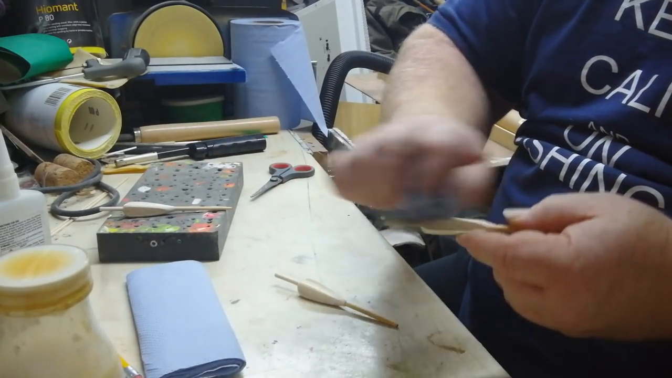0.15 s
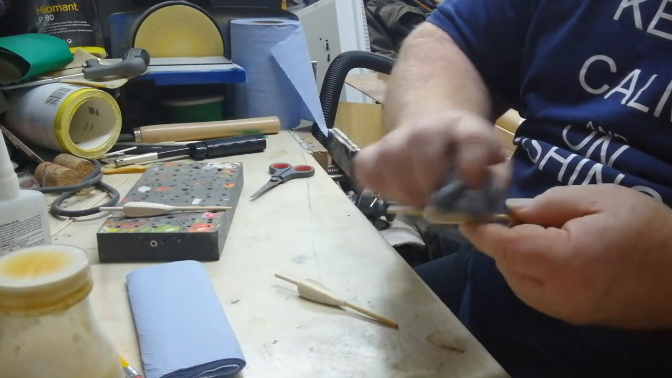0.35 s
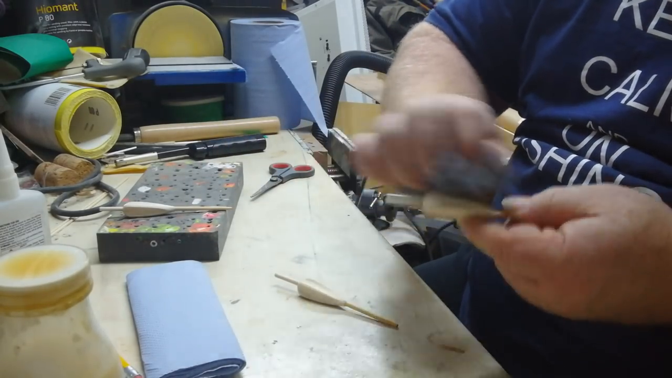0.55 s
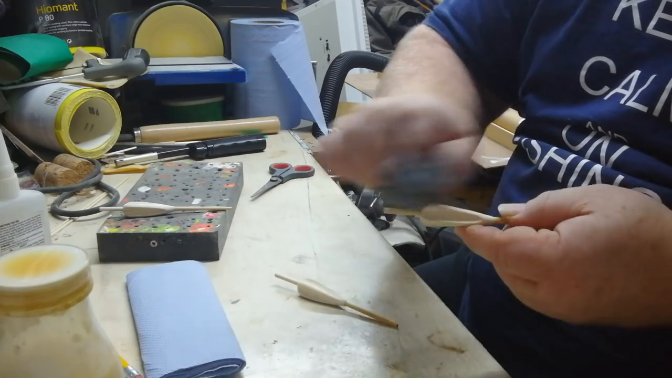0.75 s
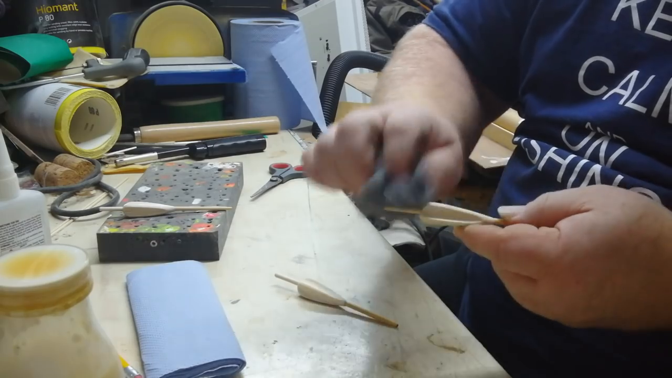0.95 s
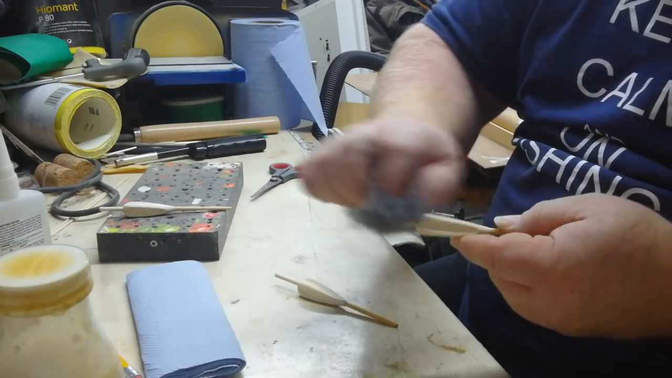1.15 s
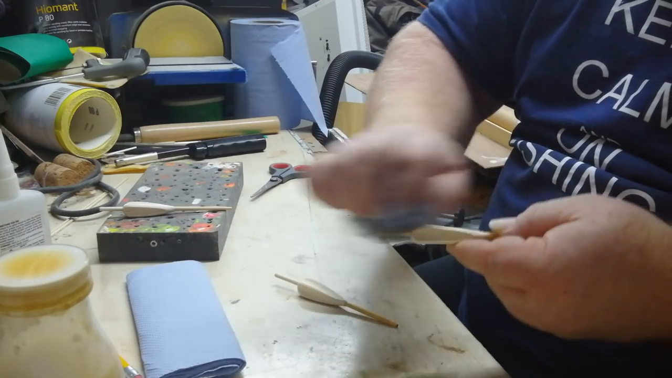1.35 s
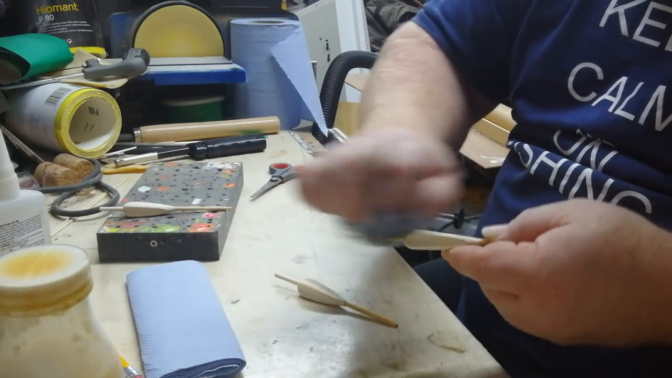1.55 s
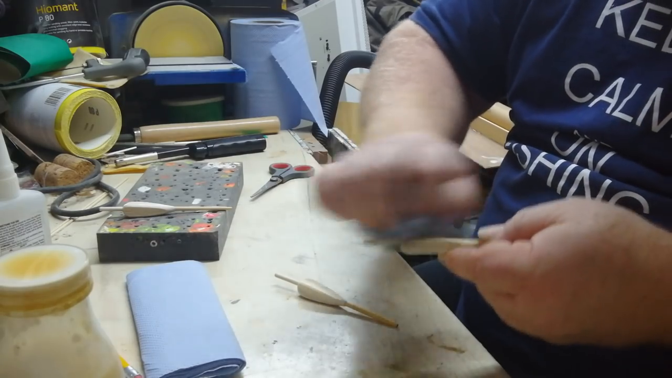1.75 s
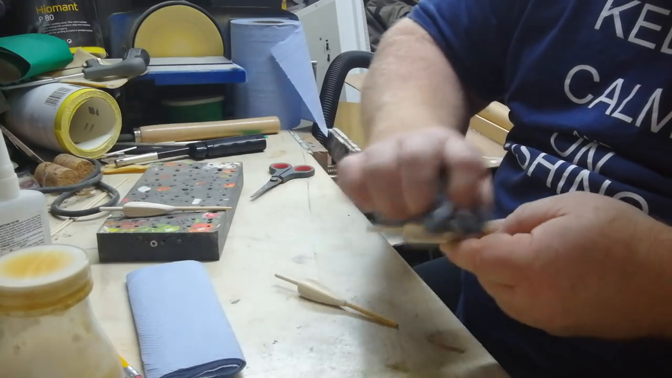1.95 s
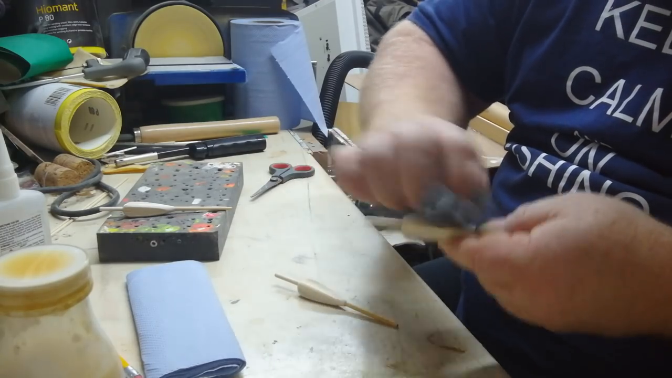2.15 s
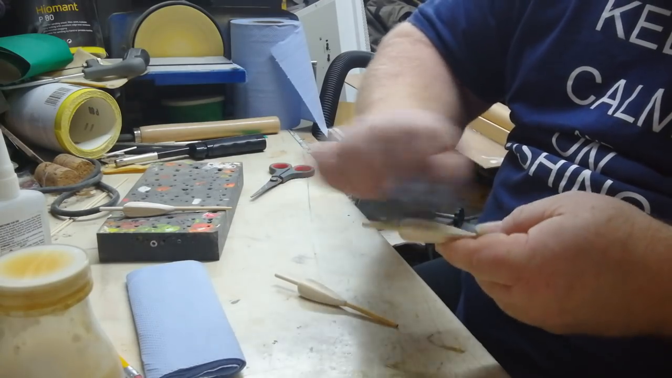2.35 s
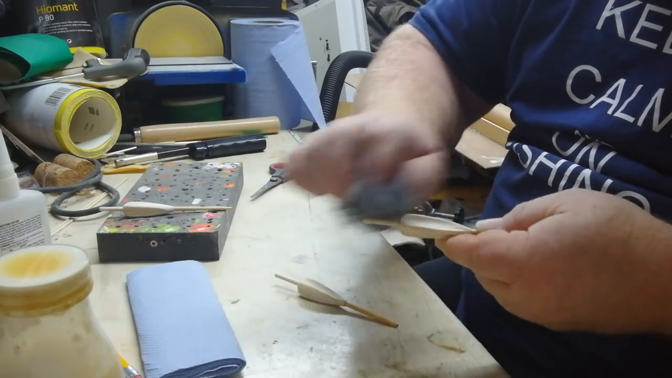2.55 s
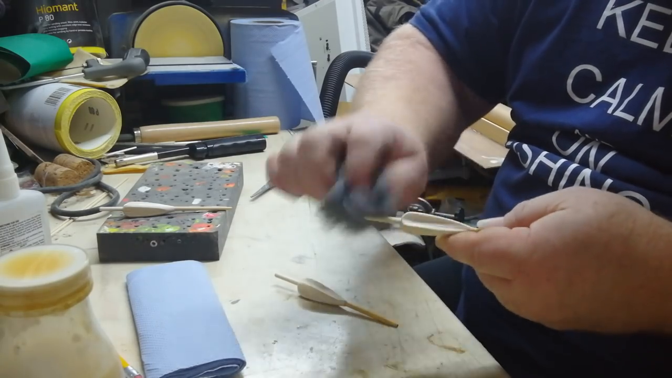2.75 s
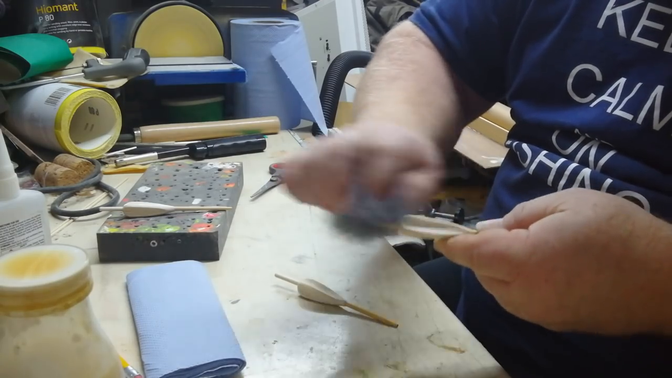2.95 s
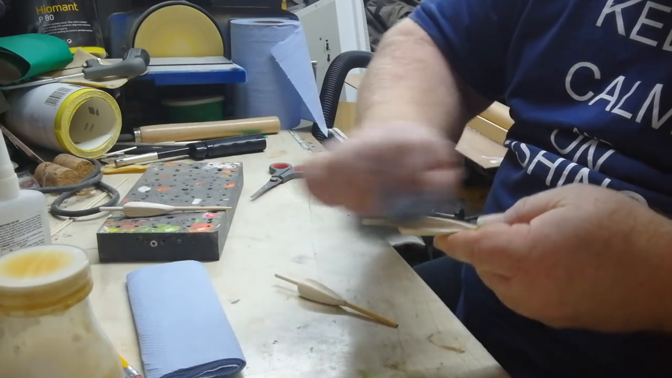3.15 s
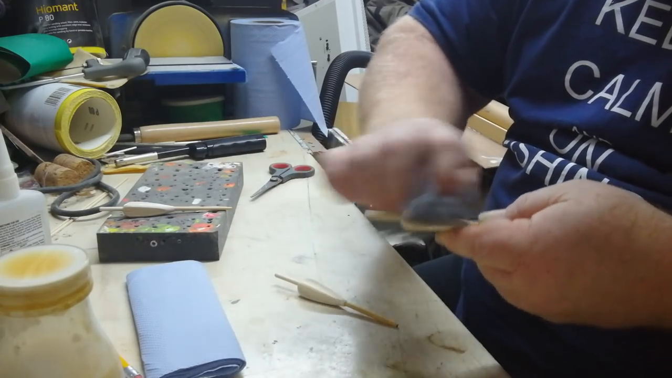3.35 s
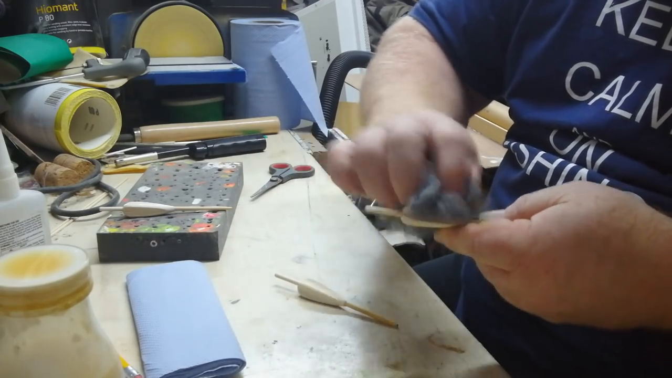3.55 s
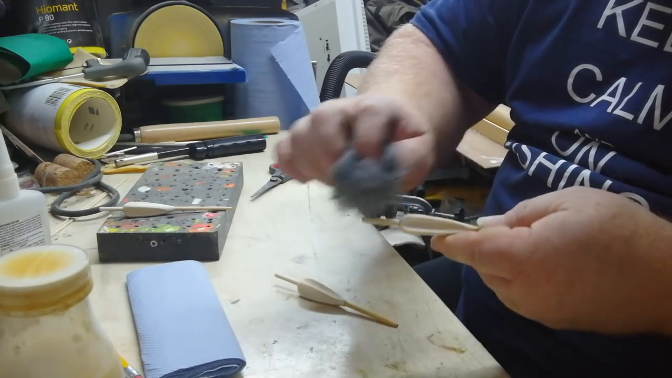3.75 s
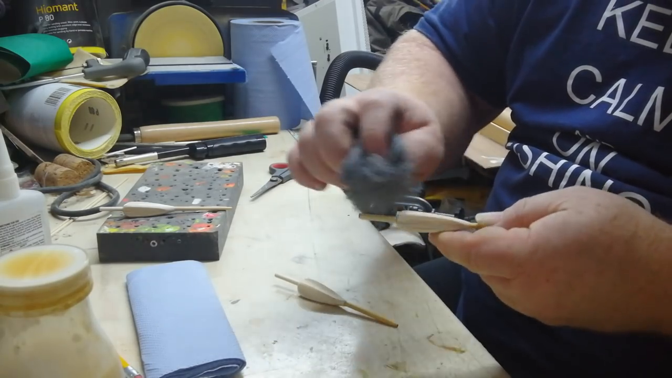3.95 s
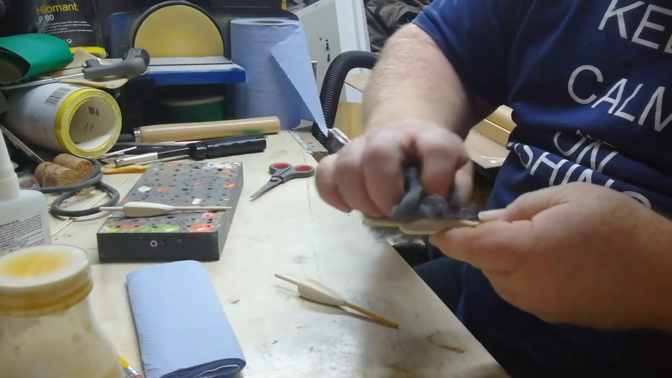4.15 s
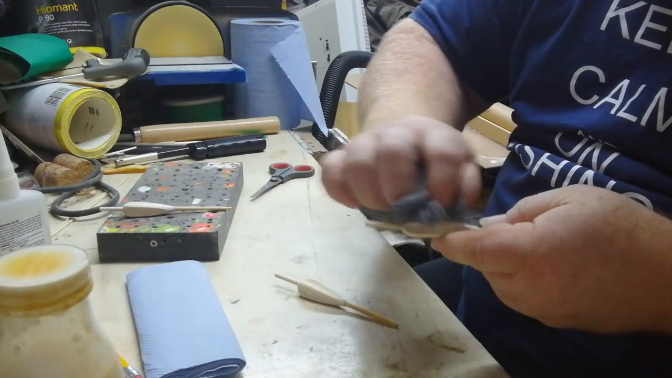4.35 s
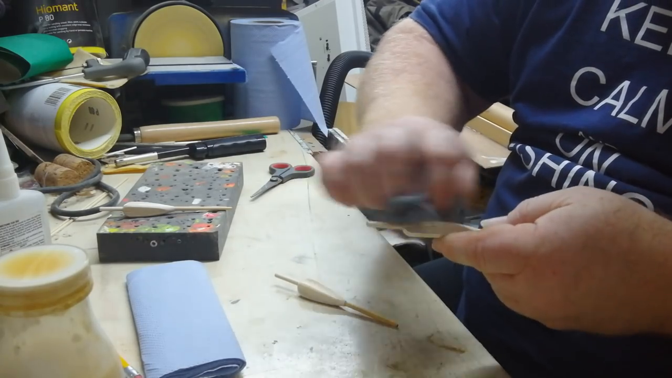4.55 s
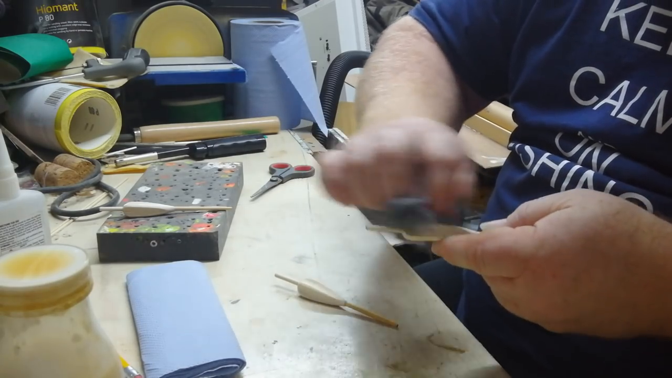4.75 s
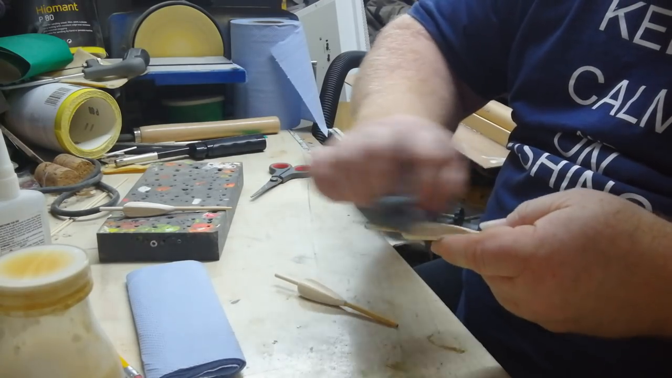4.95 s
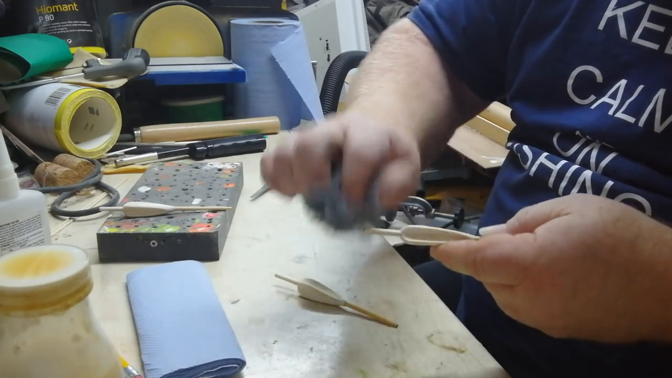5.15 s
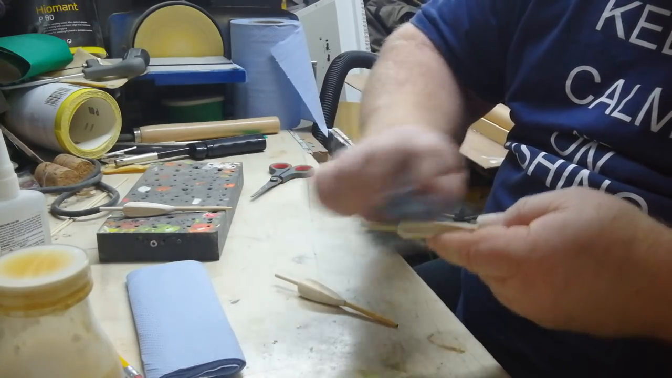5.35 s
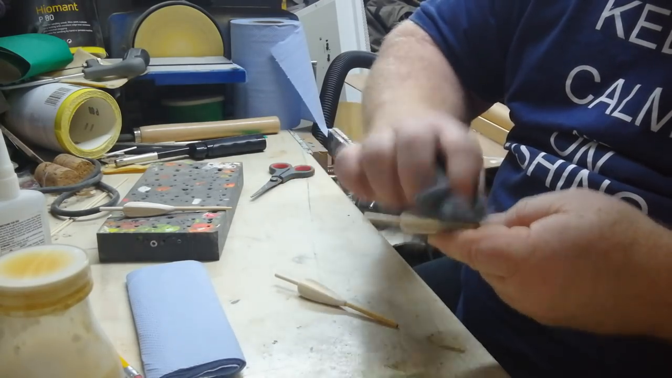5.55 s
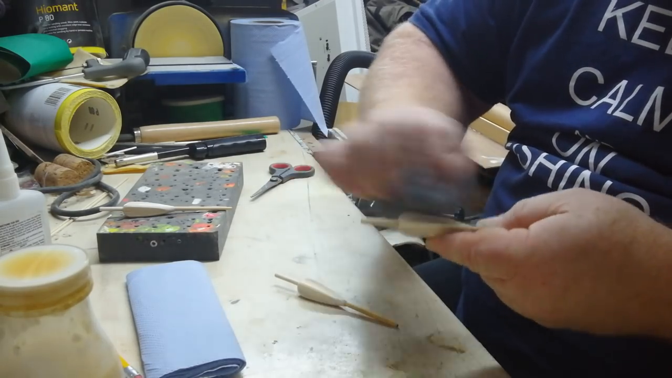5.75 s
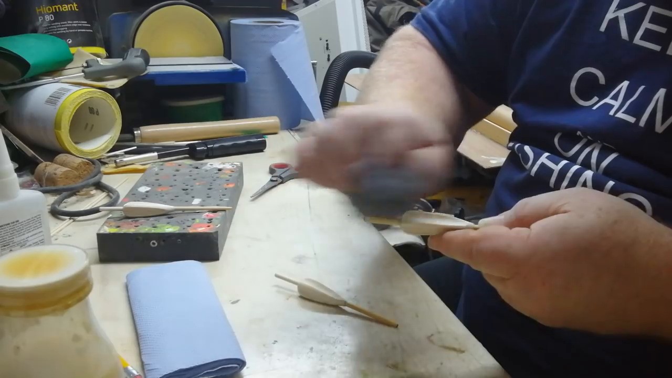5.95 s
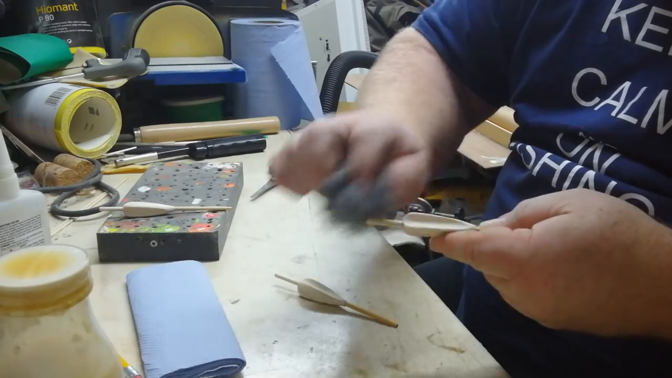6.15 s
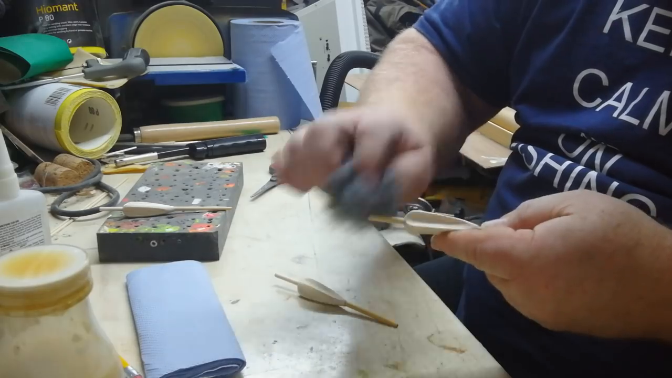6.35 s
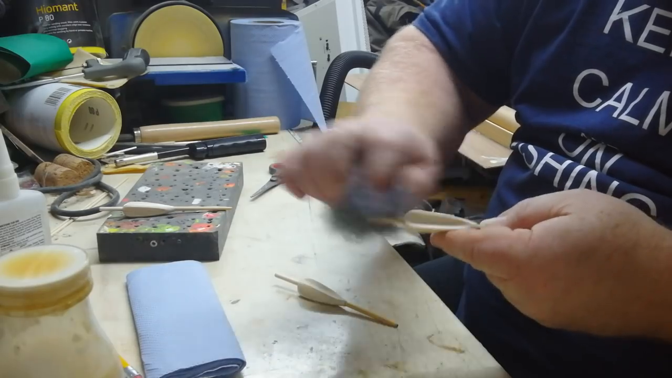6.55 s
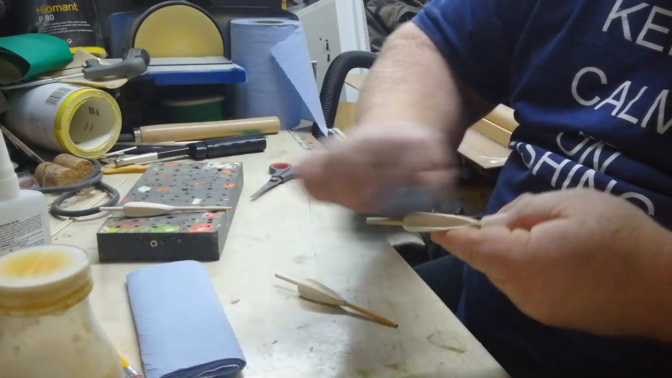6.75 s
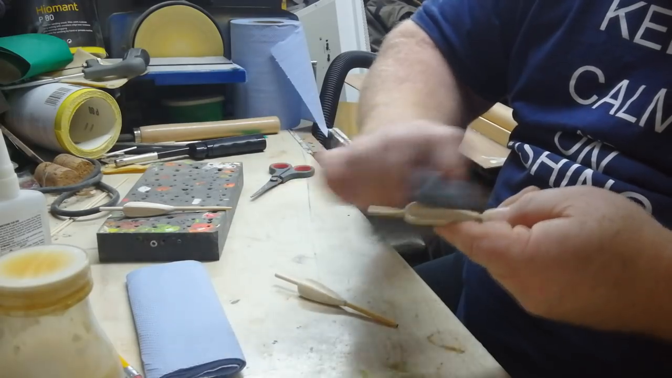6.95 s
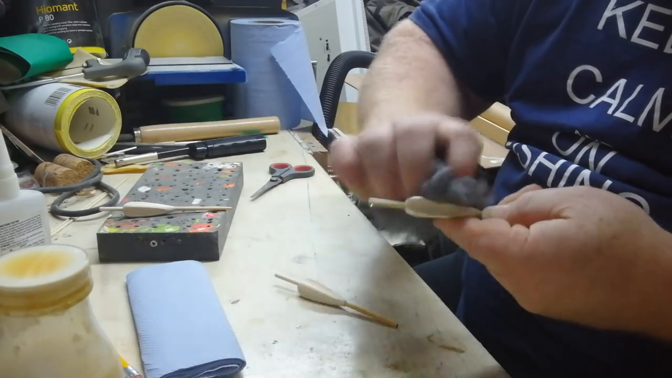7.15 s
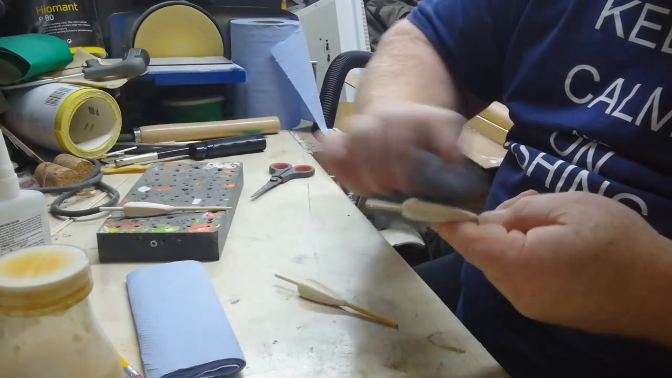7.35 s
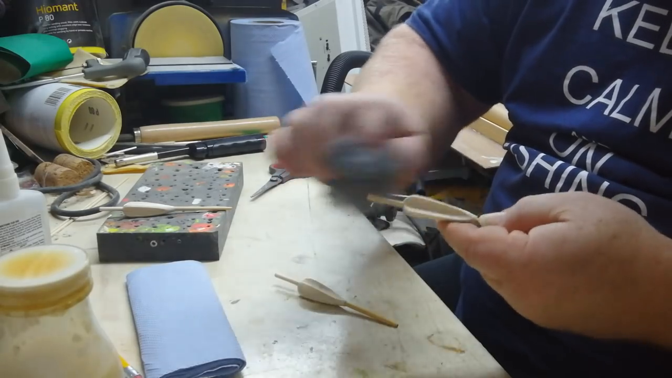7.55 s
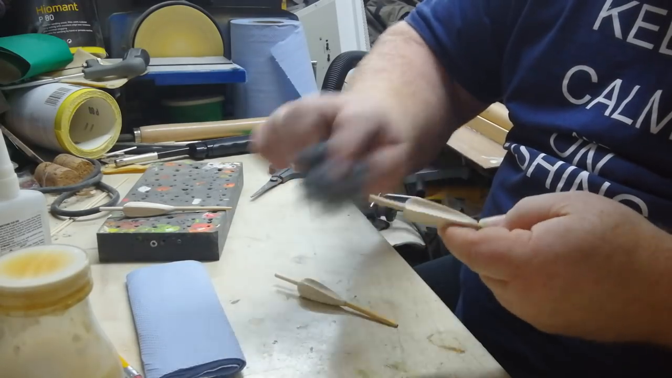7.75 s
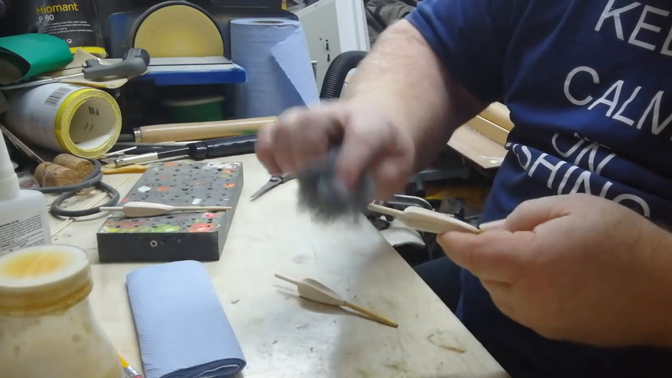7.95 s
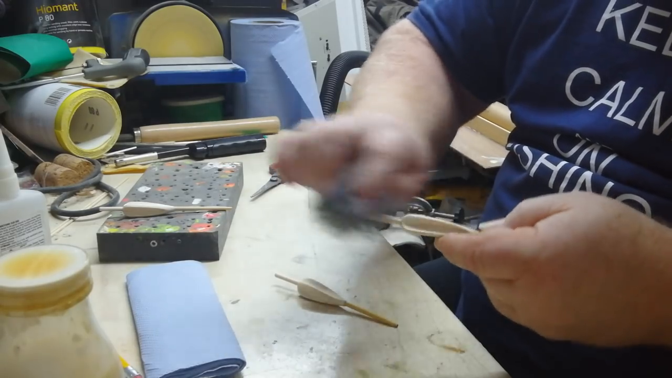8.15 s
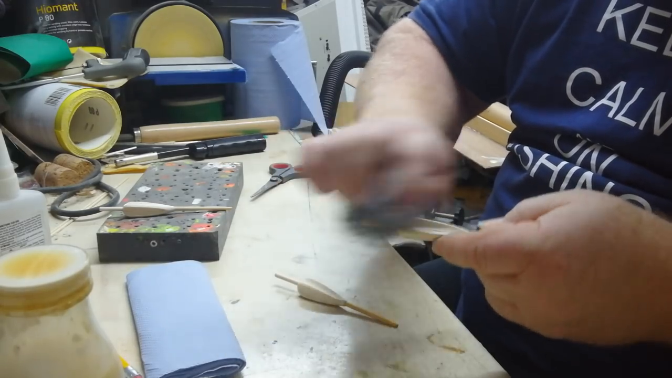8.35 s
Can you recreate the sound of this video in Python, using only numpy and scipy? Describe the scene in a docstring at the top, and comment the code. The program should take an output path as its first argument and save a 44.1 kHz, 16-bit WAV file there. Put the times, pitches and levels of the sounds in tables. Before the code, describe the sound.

Close to a stereo microphone, a pad of fine steel wool rubs a small wooden float in short, bright, gritty swishes, about four a second. After a brief gap near four seconds the strokes quicken, then return to the steady pace with sharper snags. Faint thin ringing from the stem and a few dull bench bumps appear. The workshop is small and dry, with low rumble and soft hiss.

```python
"""In a quiet workshop, a pad of fine steel wool strokes a small wooden float close to two unlike microphone ports.
Sixteen strokes come first, about four a second; from 4 s ten follow at a quicker pace, from 5.2 s fourteen more.
Each is a burst of random fibre snaps; light touches and hard snags fall among them, and the thin stem rings.
Dull bumps, each a dying mode with a tick, come through the bench at 2.5, 3.2 and 8 s.
A short room tail follows every sound; rumble and hiss from random spectra lie under it all."""
import sys
import numpy as np
from scipy import signal
from scipy.fft import rfft, irfft
from scipy.io import wavfile
from scipy.ndimage import uniform_filter1d

SR = 44100
rng = np.random.default_rng(int(sys.argv[2]) if len(sys.argv) > 2 else 0)


def pcm_store(signal):
    """Save signal as 16-bit PCM."""
    levels = np.round(np.clip(np.atleast_2d(signal), -1, 1) * 32767)
    wavfile.write(sys.argv[1], SR, levels.astype(np.int16).T)


N = 374188  # samples

# Pressed strokes on the float:
# full contact begins t/s, its length t/ms, first level/dB, last level/dB
PRESSED_STROKES = [(0.029, 69, -50, -52.5), (0.272, 63, -52.5, -48), (0.526, 49.3, -44, -45.5),
                   (0.769, 58, -44.5, -48.0), (0.996, 62, -44.5, -49.5), (1.215, 61.3, -47.5, -46),
                   (1.449, 63, -44.5, -52), (1.677, 56, -44, -47.0), (1.905, 49.5, -46.5, -44.5),
                   (2.143, 45, -42, -45), (2.372, 47.5, -43.0, -44.5), (2.597, 36.7, -40, -40),
                   (2.822, 44, -42.0, -42.5), (3.044, 43, -45.0, -44), (3.272, 43.5, -46.5, -40.5),
                   (3.51, 42.4, -46, -43), (4.023, 68, -60.5, -54.5), (4.118, 56, -46.5, -55.5),
                   (4.214, 38, -51.5, -46), (4.322, 53, -47, -50.5), (4.422, 46, -49, -48),
                   (4.534, 41, -45.5, -50.5), (4.631, 34, -46.0, -46.5), (4.736, 41, -43.5, -46.5),
                   (4.833, 43, -47, -46.5), (4.948, 54.4, -45.5, -42.5), (5.251, 38, -44, -43.5),
                   (5.496, 43, -42, -46), (5.727, 41, -43.5, -44), (5.96, 44, -42, -48),
                   (6.187, 41, -43, -44), (6.425, 38, -42.5, -42.5), (6.653, 34.3, -43, -44.5),
                   (6.884, 35, -40.5, -49), (7.112, 36, -41, -52), (7.343, 45, -42, -56.5),
                   (7.582, 32, -42, -47), (7.809, 42, -41, -56), (8.037, 36, -41.5, -53.0),
                   (8.259, 48, -43.5, -54.5)]
# Rasp of the wood, stronger under the flatter part of the pad: t/s, rasp over the scratch level/dB
WOOD_RASP = [(0, 9.5), (.6, 2), (1.6, 5.5), (2, 1), (3.5, 0.5), (4.2, 2), (5.2, 3), (6.3, 0.5), (6.8, 3),
             (7.2, 1.5), (8.4, 4.2)]
# Light touches, mostly as the pad lands for the next stroke:
# full contact begins t/s, its length t/ms, level/dB before each layer's own touch gain
LIGHT_TOUCHES = [(0.218, 29, -62), (0.72, 34, -54), (0.94, 16, -56.5), (1.155, 14, -51.5),
                 (1.388, 11, -49.5), (1.606, 27, -51.0), (1.844, 25, -51.5), (2.081, 12, -55.5),
                 (2.322, 12, -59.0), (2.474, 36, -55.0), (2.521, 37, -47), (2.747, 51, -53),
                 (2.952, 98, -50.5), (3.166, 7.3, -58), (3.189, 46, -45), (3.451, 11, -46.5),
                 (3.66, 31, -62), (3.706, 5, -50), (3.92, 14, -61), (3.95, 41, -42.5), (5.194, 21, -44),
                 (5.445, 36, -49.5), (5.607, 4.6, -51), (5.671, 18, -55), (5.897, 9.4, -52.5),
                 (6.122, 31, -52), (6.376, 89, -53), (6.596, 29, -54.5), (6.82, 34, -55.5),
                 (7.026, 17, -69), (7.291, 12, -55.5), (7.513, 11, -50.0), (7.74, 5.4, -44),
                 (7.969, 19, -41), (8.199, 26, -48.5), (8.451, 61, -52)]
# Tufts that snag hard on the wood: t/s, level/dB
HARD_SNAGS = [(3.091, -38), (3.555, -42), (5.001, -40.5), (5.5433, -41), (5.7746, -40), (5.9943, -37),
              (6.1315, -57), (6.236, -37), (7.5837, -38.5), (7.811, -37.5), (7.968, -58), (8.0476, -42),
              (8.198, -59)]
# The thin stem rings most when the pad works near the tip: t/s, ring over the scratch level/dB, f/Hz
STEM_RING = [(0, -8.5, 9700), (1.6, -21.5, 9270), (2.3, -28, 9170), (2.8, -8.5, 9700), (3.8, -13, 9450),
             (4.1, -31.5, 8650), (5.05, -19.5, 8550), (5.6, -38, 10150), (6.6, -11.5, 9530),
             (7.4, -7, 9370), (7.9, -19.5, 9660), (8.25, -10.5, 8660)]
# Each rise and fall time is the time for 20 dB
PRESS_RISE_MS, PRESS_FALL_MS = 34.8, 27
TOUCH_RISE_MS, TOUCH_FALL_MS, TOUCH_SAG_DB_PER_MS = 8., 15, -0.1137
SNAG_MS, SNAG_RISE_MS, SNAG_FALL_MS = 4.5, 5.3, 2.3
MID_EASE_DB = -1  # the pad bites on arriving and on leaving, and eases between
RASP_TILT = 0.58  # the rasp follows only this share of a stroke's swell or fade


def rubbing():
    """Fibre snaps follow each contact; pressure brings out the wood, light touches are thin and ring the stem."""
    t = np.arange(N) / SR
    press, rasp, touch, snag = 0, 0, 0, 0  # powers
    for s, ms, first_db, last_db in PRESSED_STROKES:
        press = press + contact(s, ms, first_db, last_db, PRESS_RISE_MS, PRESS_FALL_MS, MID_EASE_DB)
        middle_db = (first_db + last_db) / 2
        tilt_db = RASP_TILT * (first_db - last_db) / 2
        rasp = rasp + contact(s + 0.0036, ms, middle_db + tilt_db, middle_db - tilt_db,
                              PRESS_RISE_MS, PRESS_FALL_MS)
    for s, ms, db in LIGHT_TOUCHES:
        touch = touch + contact(s, ms, db, db + TOUCH_SAG_DB_PER_MS * ms, TOUCH_RISE_MS, TOUCH_FALL_MS)
    for s, db in HARD_SNAGS:
        snag = snag + contact(s, SNAG_MS, db, db, SNAG_RISE_MS, SNAG_FALL_MS)
    # from power every 20 samples to amplitude at every sample
    press, rasp, touch, snag = (np.sqrt(np.repeat(v, 20)[:N]) for v in (press, rasp, touch, snag))
    rasp = gain_of(np.interp(t, *np.transpose(WOOD_RASP))) * rasp

    snaps = fibres()
    low = below(snaps, 6500.0)
    s, ring_db, hz = np.transpose(STEM_RING)
    ring_hz = np.interp(t, s, hz)
    ring = evened(np.array([resonate(v, ring_hz, 230.0) for v in snaps]))
    at_tip = np.interp(t - .012, t, press)  # the pad reaches the stem late in the stroke
    ring *= gain_of(np.interp(t, s, ring_db)) * (at_tip + snag + gain_of(-2.0) * touch)
    scratch = np.hypot(np.hypot(press, snag), gain_of(-9.5) * touch)
    rasp = np.hypot(rasp, gain_of(-23.5) * touch)
    return rasp * low + scratch * (snaps - low) + ring


def contact(s, ms, first_db, last_db, rise_ms, fall_ms, ease_db=0):
    """Power of one contact over time: straight slopes in dB up to, along and down from the full contact."""
    t = np.arange(N // 20 + 1) * 20 / SR
    half = max(ms, .1) / 2
    corners = s + np.cumsum([-4 * rise_ms, 4 * rise_ms, half, half, 4 * fall_ms]) / 1000
    middle_db = (first_db + last_db) / 2 + ease_db
    db = [first_db - 80, first_db, middle_db, last_db, last_db - 80]
    return gain_of(2 * np.interp(t, corners, db))


TUFT_BANDS_HZ = (6500, 10500)  # borders between coarse, middle and fine tufts
OWN_FIBRES = 0.67  # amplitude of the snaps that one port alone hears


def fibres(snaps_per_s=12000., spread_db=1.0, tufts_per_s=250.0, tuft_db=2.5, tuft_peak_ms=0.325, depth=0.51):
    """Fibres snap singly, and coarse, middle or fine tufts let go together; each port hears some of its own."""
    snaps = gain_of(spread_db * np.minimum(rng.exponential(1, (3, N)), 6))
    snaps *= rng.choice([-1., 1.], (3, N))
    snaps *= rng.random((3, N)) < snaps_per_s / SR
    # the third stream reaches both ports
    snaps = np.sqrt(1 - OWN_FIBRES ** 2) * snaps[2] + OWN_FIBRES * snaps[:2]
    coarse, not_fine = (below(snaps, hz) for hz in TUFT_BANDS_HZ)
    u = np.arange(400) / (tuft_peak_ms * SR / 1000)
    swell = u * np.exp(1 - u)  # quick rise, slower fall
    out = 0
    for band in (coarse, not_fine - coarse, snaps - not_fine):
        tufts = gain_of(tuft_db * np.minimum(rng.exponential(1, N), 2.5))
        tufts *= rng.random(N) < tufts_per_s / SR
        out = out + band * (1 + depth * signal.oaconvolve(tufts, swell)[:N])
    return evened(shifting(out))


def shifting(x, patchy_db=2.14):
    """The pad turns and the hands shade it, so the colour drifts in random patches of time and frequency."""
    z = signal.stft(x, nperseg=256, noverlap=192)[2]
    patches = rng.standard_normal(z.shape[1:])
    patches = evened(uniform_filter1d(uniform_filter1d(patches, 4, 0), 50, 1))
    return signal.istft(z * gain_of(patchy_db * patches), nperseg=256, noverlap=192)[1][:, :N]


# Colour of the scratch at the two microphone ports: f/Hz, left relative level/dB, right relative level/dB
PORT_COLOURS = [(1080, -45.5, -37.5), (1820, -28, -38), (2430, -36, -29), (2890, -31, -25),
                (4260, -21.5, -15.5), (5370, -17.5, -19), (7300, -26.5, -10), (8070, -6.5, -1.5),
                (8740, -19.5, -2), (9500, -11, -6.5), (10650, -14.5, -9), (12200, -10.5, -12.5),
                (13100, -9, -12), (14400, -9, -15), (16200, -11.5, -12)]
# Echoes off bench and hands, paths some 0.2 and 0.5 m longer: delay t/ms, left level/dB, right level/dB
NEAR_ECHOES = [(.57, -16, -20), (1.41, -12, -20)]
# Cavity of the left, then of the right port: f/Hz, width f/Hz, level/dB
PORT_CAVITIES = [(13620, 73, 2), (8320, 120, -13)]
LEFT_LAG_MS = 0.1161  # some 4 cm farther from the float


def ports(x):
    """Each port colours the sound its own way; near surfaces send echoes and the left hears late."""
    hz = np.fft.rfftfreq(2048, 1 / SR)
    level = np.sqrt(np.mean(gain_of(2 * read(PORT_COLOURS, hz, column=2))))  # of the right port
    out = []
    for c in range(2):
        colour = rfft(causal(read(PORT_COLOURS, hz, column=1 + c)))
        paths = 1 + sum(gain_of(e[1 + c]) * np.exp(-2j * np.pi * hz * e[0] / 1000) for e in NEAR_ECHOES)
        late = np.exp(-2j * np.pi * hz * (1 - c) * LEFT_LAG_MS / 1000)
        response = irfft(colour * paths * late)[:1024]
        heard = signal.oaconvolve(x[c], response)[:N] / level
        ring_hz, width_hz, ring_db = PORT_CAVITIES[c]
        out.append(heard + gain_of(ring_db) * resonate(heard, ring_hz, width_hz))
    return gain_of(3.5) * np.array(out)


# Dull bumps through the bench: t/s, mode level/dB, f/Hz, mode's 60 dB decay t/s, tick level/dB
BENCH_BUMPS = [(2.467, -63, 385, 0.045, -63.5), (3.159, -51.5, 139, 0.13, -92),
               (8.031, -60, 600, 0.037, -66)]


def bumps():
    """Each bump is one soft, quickly dying mode with a dull tick at its start."""
    out = np.zeros(N + SR)
    t = np.arange(SR // 4) / SR
    ticks = evened(below(rng.standard_normal((len(BENCH_BUMPS), len(t))), 5500.0))
    for (s, db, hz, t60, tick_db), tick in zip(BENCH_BUMPS, ticks):
        soft_start = 1 - np.exp(-t / 0.0017)
        mode = gain_of(db - 60 * t / t60) * soft_start * np.sin(2 * np.pi * hz * t)
        at = round(s * SR)
        out[at:at + len(t)] += mode + gain_of(tick_db - 60 * t / 0.19) * tick
    return out[:N]


HANDS_TURNS_PER_S = 1.684  # sets of paths into the room that the moving hands pass each second


def workshop(x, t60=0.066, wet_db=-6.5, count=4):
    """A short cluttered-room tail, other for each port; moving hands blend from one set of paths to the next."""
    t = np.arange(SR // 3) / SR
    turn = np.arange(N) / SR * HANDS_TURNS_PER_S
    tails = rng.standard_normal((count, 2, len(t))) * gain_of(-60 * t / t60) * (t > .004)
    wet = 0
    for k, tail in enumerate(tails):
        apart = abs((turn - k + count / 2) % count - count / 2)  # steps around the circle of sets
        share = np.cos(np.pi / 2 * np.minimum(apart, 1))
        wet = wet + signal.oaconvolve(x * share, tail, axes=1)
    return x + gain_of(wet_db) * wet[:, :N] / np.linalg.norm(tails[0, 0])


# Spectrum of the room tone: f/Hz, relative density level/dB
TONE_SPECTRUM = [(20, -20), (34, -2), (47, 4.5), (60, -2.5), (78, 4), (100, -3.5), (230, -9), (520, -15.5),
                 (1000, -15.5), (2400, -16.5), (3400, -16), (6500, -21.5), (8600, -17.5), (10800, -26),
                 (15700, -27)]
# Likeness of the two ports: f/Hz, correlation from -1 (opposite) to 1 (same)
TONE_LIKENESS = [(60, 1.0), (110, 0.98), (200, 0.9), (380, -0.58), (700, -0.51), (1290, 0.31),
                 (2380, -0.49), (4400, 0.082)]
# Balance of the two ports: f/Hz, left over right level/dB
LEFT_OVER_RIGHT = [(60, 0), (380, 0), (2380, 0), (15000, -1.5)]
# Swells of the deepest rumble, used as departures from their mean: t/s, level/dB
RUMBLE_SWELLS = [(0.0, -93.5), (0.35, -69), (2.27, -72.5), (2.64, -64.5), (2.86, -80), (3.24, -61),
                 (4.01, -78.5), (4.44, -66), (4.94, -74.5), (7.44, -72.5), (7.89, -75.5), (8.48, -79)]
ROOM_TONE_DB = -66.5  # rms


def room_tone():
    """Hiss and swelling rumble from random short-time spectra; the bass is alike at both ports."""
    frames = N // 512 + 5
    hz = np.fft.rfftfreq(2048, 1 / SR)
    a, b, c, d, patches = rng.standard_normal((frames, 1025, 5)).T
    patches = evened(uniform_filter1d(uniform_filter1d(patches, 20, 0), 12, 1))
    s, swell_db = np.transpose(RUMBLE_SWELLS)
    swell_db = np.interp(np.arange(frames) * 512 / SR, s, swell_db - swell_db.mean())
    deepest = 1 / (1 + (hz[:, None] / 70) ** 4)
    same = np.clip(read(TONE_LIKENESS, hz), -1, 1)[:, None]
    left = a + 1j * b
    right = same * left + np.sqrt(1 - same ** 2) * (c + 1j * d)
    z = np.array([left, right])
    z *= gain_of(read(TONE_SPECTRUM, hz)[:, None] + 1.5 * patches + swell_db * deepest)
    z *= gain_of(np.outer([.5, -.5], read(LEFT_OVER_RIGHT, hz)))[:, :, None]
    tone = signal.istft(z, nperseg=2048, noverlap=1536)[1][:, :N]
    return gain_of(ROOM_TONE_DB) * evened(tone)


def gain_of(db):
    """Decibels to a factor."""
    return 10 ** (np.asarray(db) / 20)


def evened(x):
    """Scales to rms 1."""
    return x / np.sqrt(np.mean(x ** 2) + 1e-20)


def read(points, hz, column=1):
    """A spectrum table read on a log-frequency axis."""
    points = np.array(points)
    return np.interp(np.log(hz + 1), np.log(points[:, 0] + 1), points[:, column])


def resonate(x, hz, width_hz):
    """Shifts the curve hz down to zero, smooths, and shifts back: a resonance of gain 1."""
    turn = np.exp(2j * np.pi * np.cumsum(hz * np.ones(len(x))) / SR)
    r = np.exp(-np.pi * width_hz / SR)
    return 2 * (turn * signal.lfilter([1 - r], [1, -r], x / turn + 1e-18)).real


def causal(db):
    """Minimum-phase causal filter with the given gains on an even frequency grid."""
    log_gain = np.log(gain_of(np.r_[db, db[-2:0:-1]]))
    return np.fft.ifft(np.exp(np.conj(signal.hilbert(log_gain)))).real


def below(x, hz):
    """The part of x under hz, without delay."""
    return signal.sosfiltfilt(signal.butter(2, hz, fs=SR, output="sos"), x)


def scene():
    """Rubbing and bumps in the workshop over its room tone."""
    close = ports(rubbing()) + bumps()
    return workshop(close) + room_tone()


EDGE_HZ = 15750


def record(dry):
    """Limits the band with a steep low-pass at EDGE_HZ."""
    low_pass = signal.firwin(767, EDGE_HZ, window=("kaiser", 9), fs=SR)
    return signal.oaconvolve(dry, low_pass[None], "same")


dry = scene()
out = record(dry)
pcm_store(out)
```